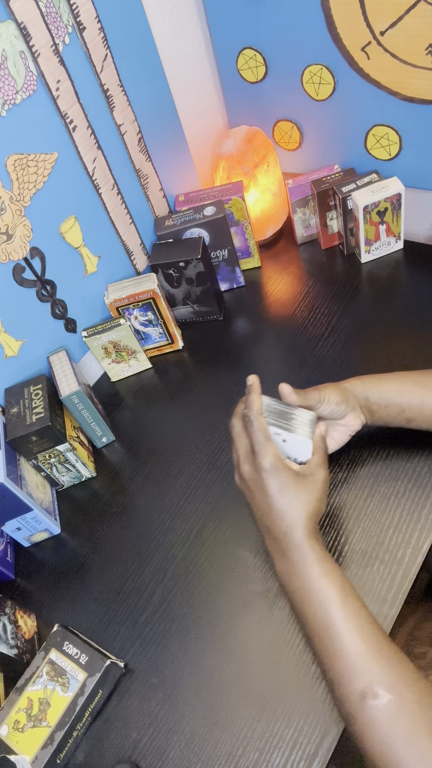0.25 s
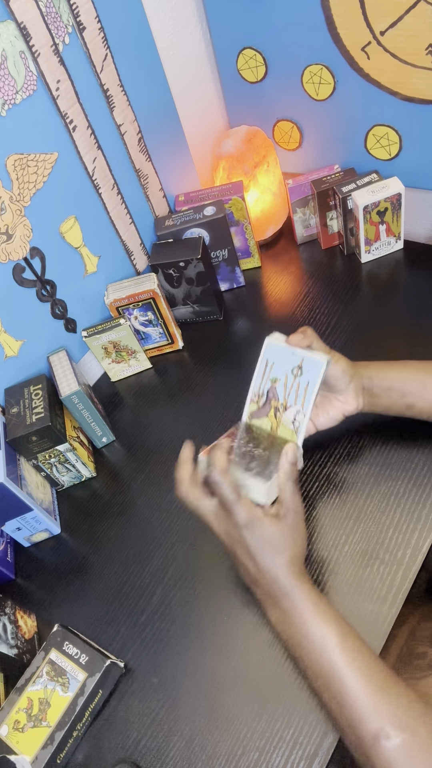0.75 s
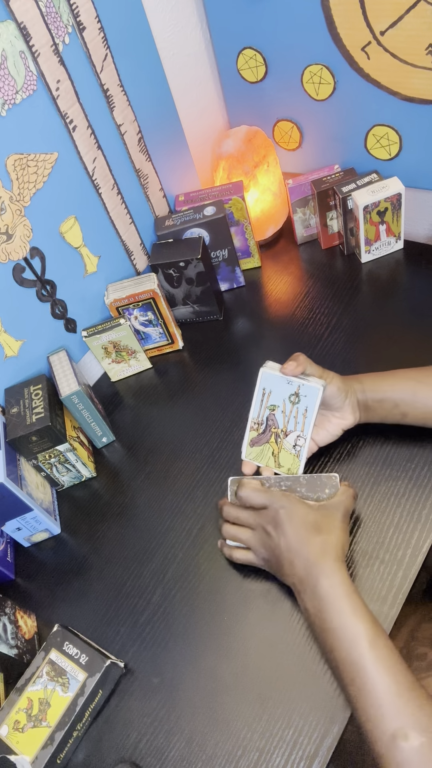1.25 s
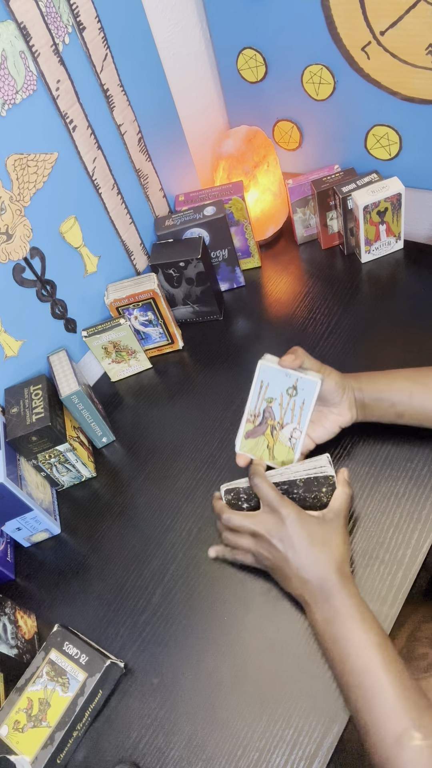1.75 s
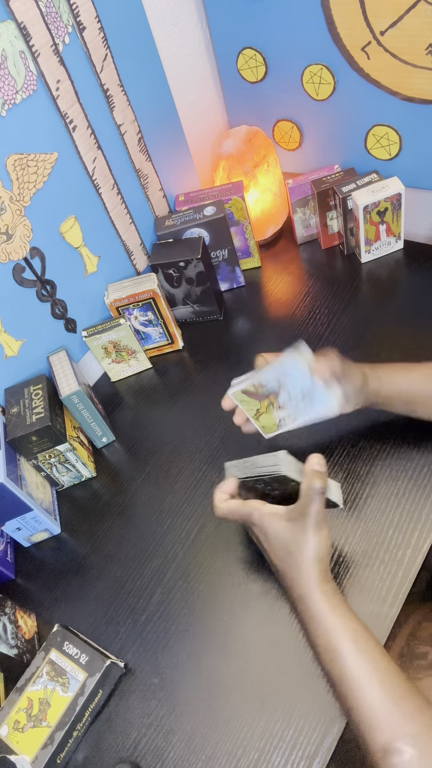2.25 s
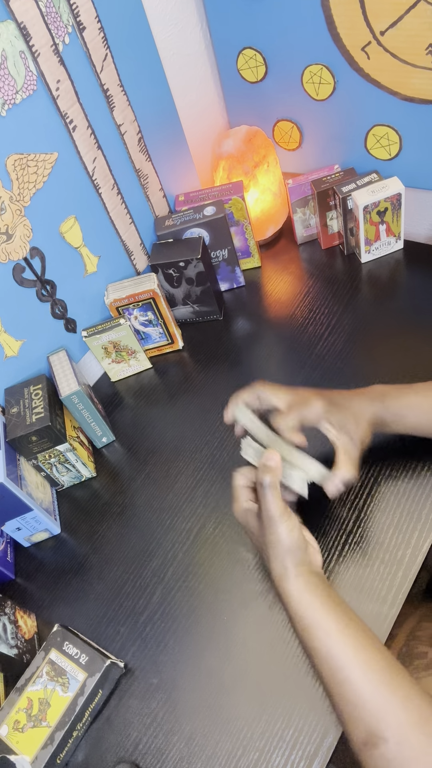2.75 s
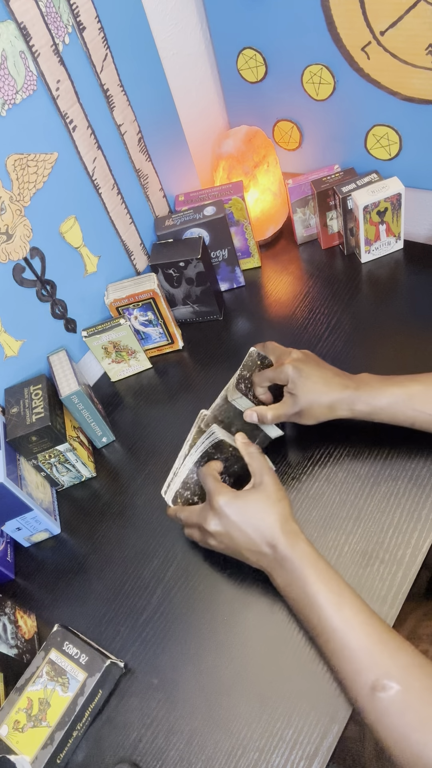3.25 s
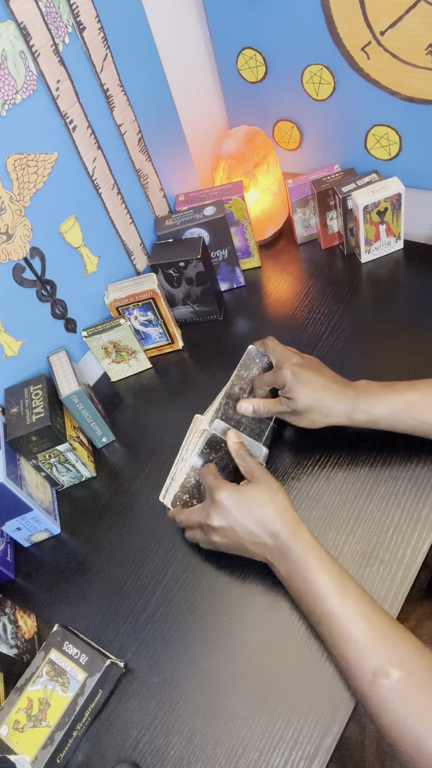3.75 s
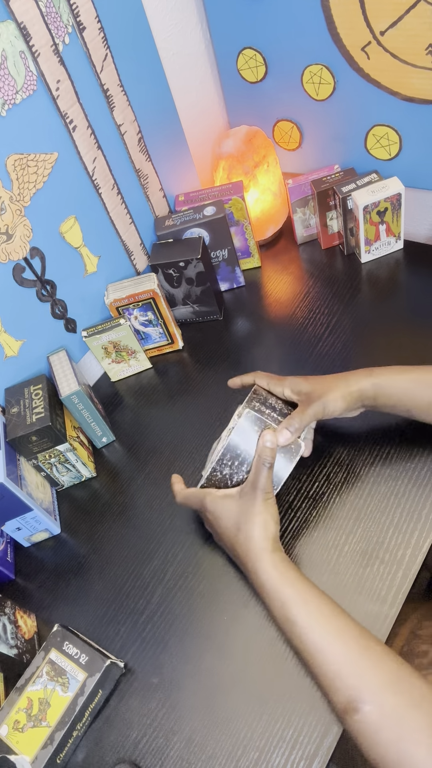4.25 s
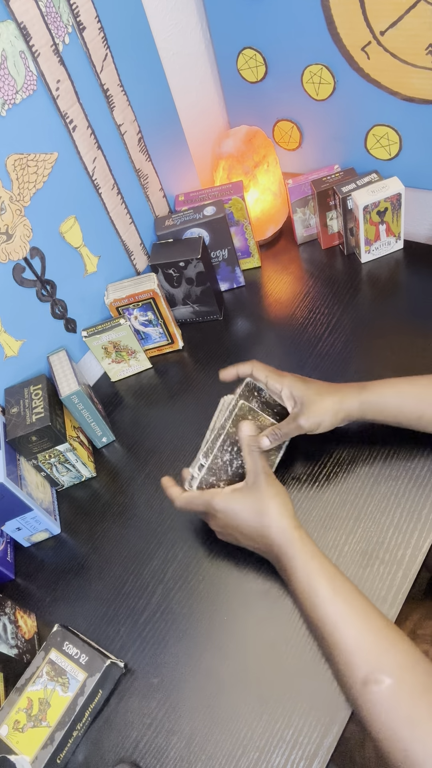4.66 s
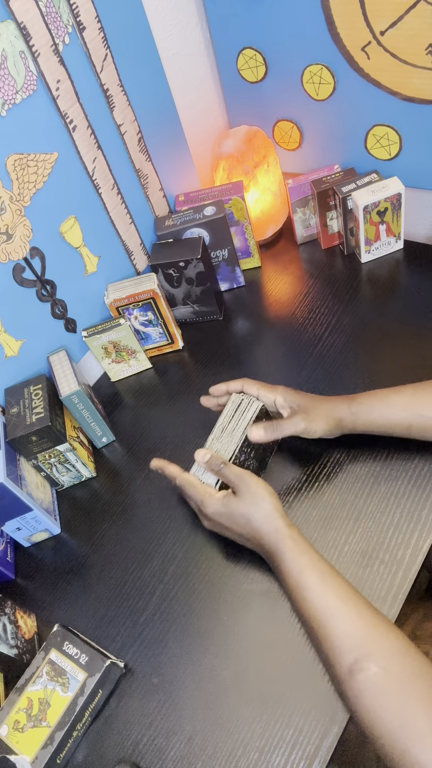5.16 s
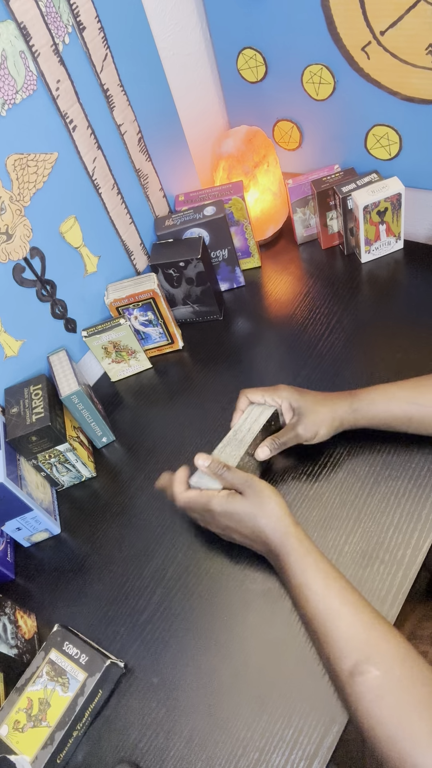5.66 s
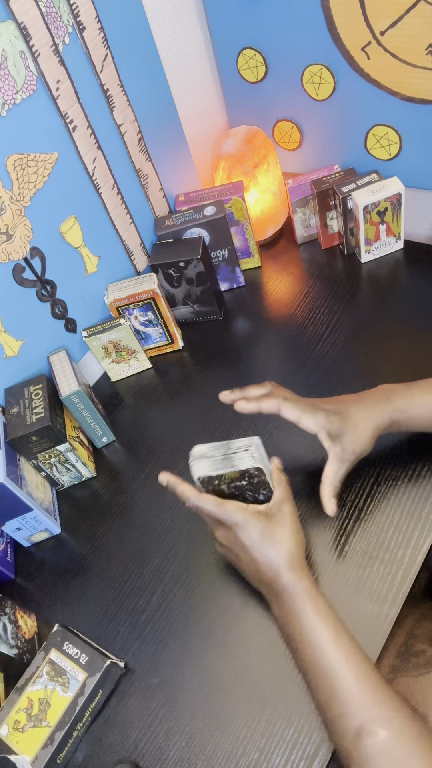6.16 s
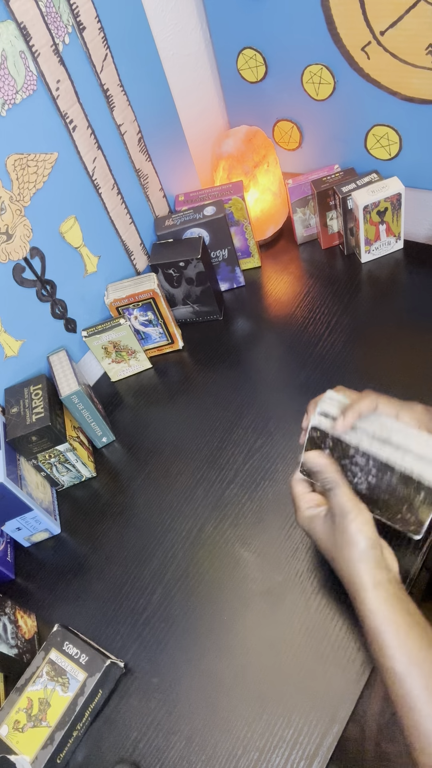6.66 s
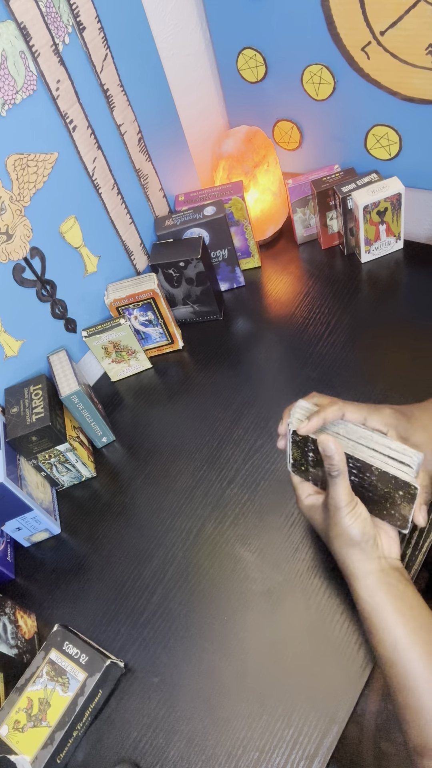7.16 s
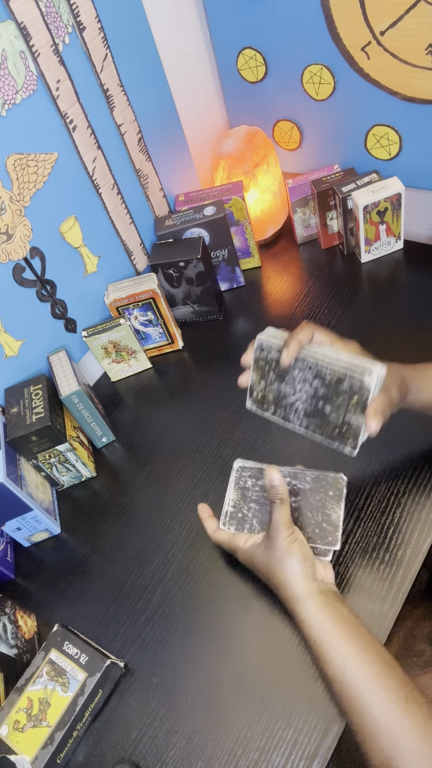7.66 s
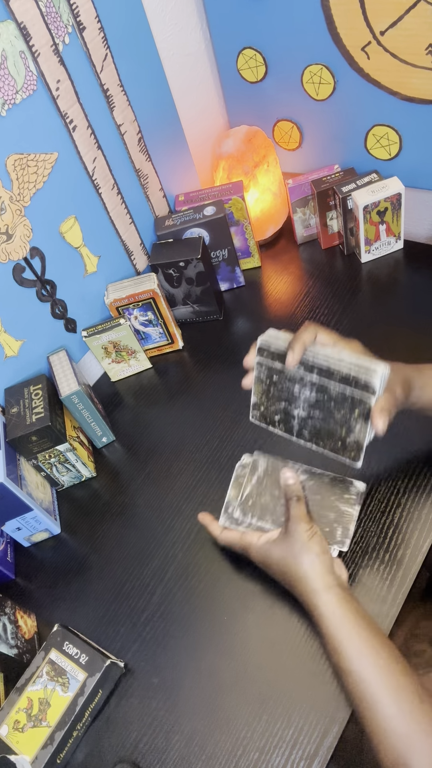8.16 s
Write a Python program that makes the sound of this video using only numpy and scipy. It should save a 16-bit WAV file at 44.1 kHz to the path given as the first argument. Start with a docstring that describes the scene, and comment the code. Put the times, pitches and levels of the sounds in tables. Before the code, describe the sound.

Heard from close by in a small quiet room, cards tap and rub as a deck is split on a wooden tabletop. A short creak leads into a loud, crisp riffle, and the cards spring back together in a quieter ripple. A cluster of clacks and a dull table thump follow as the deck is straightened, then soft swishes and small slaps of an overhand shuffle.

```python
"""A deck of large cards on a wooden table in a small room, heard close by a pair of microphones.
The deck is cut and knocked square, creaks as the thumb bends it, is riffled together and springs out of a bridge,
then is knocked square again and shuffled overhand. Each contact is a short crush of many card edges ringing a packet;
the table top booms under it from low damped modes, and card faces rub in between as shaped, flickering noise.
A steady faint room tone lies beneath, and changing reflections surround the cards."""
import sys
import numpy as np
from scipy import signal
from scipy.fft import rfft, irfft
from scipy.io import wavfile

SR = 44100
rng = np.random.default_rng(int(sys.argv[2]) if len(sys.argv) > 2 else 0)


def master_out(mix):
    """Clip the mix to full scale and print it as 16-bit PCM to the path in sys.argv[1]."""
    frames = np.transpose(np.atleast_2d(mix))
    ceiling = np.clip(frames, -1, 1)
    pcm = np.round(ceiling * 32767).astype(np.int16)
    wavfile.write(sys.argv[1], SR, pcm)


N = 370440
TIME = np.arange(N) / SR
SLIDE_TIME = TIME[::64]   # coarse clock, enough for slow changes of level


def from_db(db):
    """Amplitude ratio of a level in dB."""
    return 10 ** (np.asarray(db) / 20)


def unit_energy(x):
    """Scale a sound so that its squares sum to 1."""
    return x / np.sqrt(np.sum(x ** 2) + 1e-30)


def seconds(length):
    """Clock in seconds for a short sound."""
    return np.arange(int(length * SR)) / SR


def add(track, s, sound):
    """Mix a sound into the track from time s on."""
    start = int(np.clip(s * SR, 0, N - 1))
    track[start:start + len(sound)] += sound[:N - start]


def convolve(x, response):
    """Pass a sound through an impulse response, keeping its length."""
    return signal.fftconvolve(x, response)[:len(x)]


def butter(x, hz, kind, order):
    """Butterworth filter."""
    return signal.sosfilt(signal.butter(order, hz, kind, fs=SR, output="sos"), x)


def coloured(x, spectrum):
    """Give a steady noise a spectrum; rms 1."""
    hz, db = np.transpose(spectrum)
    bins_hz = np.fft.rfftfreq(N, 1 / SR)
    gain = from_db(np.interp(np.log(bins_hz + 1), np.log(hz), db))
    return unit_energy(irfft(rfft(x) * gain, N)) * np.sqrt(N)


def wander(hz):
    """Slow random drift through hz random points per second of spread 1."""
    knots = rng.standard_normal(1000)
    return np.interp(SLIDE_TIME * hz, np.arange(len(knots)), knots)


# The still room. Each row: frequency in Hz, relative level in dB per Hz.
STILL_ROOM_SPECTRUM = [(20, -31), (45, 2), (80, 12), (110, -7), (145, -5), (200, -9.5), (320, -21),
                       (550, -37), (1100, -43.5), (1650, -47), (2000, -32.5), (2400, -44.5), (6000, -39.5),
                       (15000, -45.5)]


def still_room(level_db):
    """Steady noise, strongest in the bass, independent of the hands."""
    return from_db(level_db) * coloured(rng.standard_normal(N), STILL_ROOM_SPECTRUM)


def resonances(modes):
    """Damped modes, a wider one dying sooner; energy 1."""
    t = seconds(.08)
    ring = np.zeros(len(t))
    for hz, width, db in modes:
        decay = width * np.exp(-np.pi * width * t)   # the factor of width keeps db the height of the peak
        ring += from_db(db) * decay * np.cos(2 * np.pi * hz * t)
    return unit_energy(ring)


def disperse(x, hz, count):
    """Bending waves in card are slower at low pitch, so a click comes out as a falling chirp."""
    pole = np.exp(-2 * np.pi * hz / SR)
    return signal.sosfilt(np.tile([-pole, 1, 0, 1, -pole, 0], (count, 1)), x)


def cushion(x, hz):
    """A soft contact rounds the push: two gentle low-passes in a row."""
    r = np.exp(-2 * np.pi * hz / SR)
    return signal.lfilter([(1 - r) ** 2], [1, -2 * r, r * r], x)


# The wooden table top's low modes. Each row: frequency in Hz, relative level in dB, time to fall 60 dB in s.
TABLE_TOP_MODES = [(69.6, -19.5, 0.21), (84.6, -21.5, 0.57), (144.36, 2, .19), (173.5, -17.5, 0.36),
                   (193, -14, 0.31), (239.8, -11.5, 0.22), (298.1, -8.5, 0.088), (331, -4.5, 0.085)]


def table_ring(push_ms):
    """The table top answers a soft push with its low modes; energy 1."""
    t = seconds(.4)
    ring = np.zeros(len(t))
    for k, (hz, db, t60) in enumerate(TABLE_TOP_MODES):
        ring += (-1) ** k * from_db(db - 60 * t / t60) * np.sin(2 * np.pi * hz * t)
    push = t * np.exp(-1000 * t / push_ms)
    return unit_energy(butter(convolve(ring, push), 45, "high", order=2))   # the deepest bass falls away below about 45 Hz


# Knock, clack, crack and fizz registers. Each row: low edge in Hz, high edge in Hz.
REGISTER_EDGES = [(200, 813), (780, 2435), (2300, 4430), (4700, 13000)]
# A harder contact tips the colour. Listed for knock, clack, crack, fizz: dB of level per dB of brightness.
BRIGHTNESS_TILT = (-1.14, 0.18, 1, 1.6)
CLACK_CORNER_HZ, CRACK_CORNER_HZ = 3600, 5560   # roll-off within those registers at brightness 0
CORNER_FOLLOWS = 0.94   # a softer contact leans lower: dB of corner frequency per dB of brightness


def contacts(rows, modes, colour_db, ring_db, knock_hz, top_db, grain, slap, bend_hz, detune, count):
    """Card edges land within a few ms, with a slap at the thick of the crush, and ring the packet; the table booms."""
    body = from_db(ring_db) * resonances(modes)
    body[0] += 1   # the direct click, together with the ring
    body = disperse(body, bend_hz, count)
    *lower, fizz = [butter(body, edges, "band", order=4) for edges in REGISTER_EDGES]
    top = from_db(top_db) * butter(fizz, 5700, "high", order=3)   # thick packets have little top
    fizz = butter(fizz, 5500, "low", order=3) + top
    corners_hz = [knock_hz, CLACK_CORNER_HZ, CRACK_CORNER_HZ]
    ms = 1000 * np.arange(len(body)) / SR
    one_ms = np.sqrt(SR / 1000)   # levels count energy as if packed into 1 ms
    cards, table, boom = np.zeros(N), np.zeros(N), table_ring(push_ms=0.42)
    for s, contact_ms, level_db, bright_db, boom_db in rows:
        hard = from_db(CORNER_FOLLOWS * bright_db)
        stretch = np.exp(detune * rng.standard_normal())   # the free length of card, and so its pitch, differs
        registers = []
        for register, corner_hz in zip(lower, corners_hz):
            rounded = cushion(register, corner_hz * hard)
            registers.append(np.interp(ms * stretch, ms, rounded, right=0))
        registers.append(fizz)
        crush = np.sqrt(ms) * np.exp(-ms / contact_ms)
        levels_db = level_db + np.array(colour_db) + bright_db * np.array(BRIGHTNESS_TILT)
        for k, (response, db) in enumerate(zip(registers, levels_db)):
            edge_sizes = np.exp(grain * rng.standard_normal(len(ms)))
            force = unit_energy(crush * rng.standard_normal(len(ms)) * edge_sizes)
            force[np.argmax(crush)] += slap / (1 + k) ** 2   # the slap is one pulse, felt most in the low registers
            add(cards, s, one_ms * from_db(db) * unit_energy(convolve(force, response)))
        add(table, s, one_ms * from_db(boom_db) * boom)
    return np.array([cards, table])


# Packets knocked on the table and against each other.
# Each row: start in seconds, contact time in ms, level in dB, brightness in dB, table boom in dB.
KNOCKS = [(0.0, 2.7, -16.5, 5, -11), (0.0086, 3.9, -18.5, 6.5, -28.5), (0.2571, 3.8, -69, -26, -39),
          (1.1667, 2.8, -36.5, 0.5, -27), (1.476, 1.3, -34.5, 0.5, -42), (1.484, 14, -26, -1, -43),
          (1.4997, 6, -24, -1.5, -31), (1.5104, 6.9, -24, -4.5, -17), (1.663, 7.2, -32.5, -4, -24),
          (1.913, 4.7, -54.5, 8.5, -57), (2.0219, 16.4, -21.5, -1, -27.5), (2.0333, 4.5, -6, 3, -9.5),
          (2.3987, 4.3, -55, -2.5, -38.5), (3.0777, 2.33, -26.5, -2, -28), (4.0296, 3.6, -38.5, 1, -37),
          (4.0741, 3.7, -54, -17, -23), (4.0943, 4.6, -53.5, -25, -19), (4.8303, 5.2, -20.5, -6, -34),
          (4.841, 1.8, -35.5, -9, -9), (4.8849, 2.15, -12.5, 8, -20), (4.8996, 3.65, -12.5, 3.5, -9.5),
          (4.99, 3.1, -24.5, 4, -35), (5.0577, 3.15, -25, 4, -45), (5.0807, 1.16, -17, 7.5, -24.5),
          (5.1077, 1.5, -27.5, -8, -34), (5.12, 2.2, -31, 5.5, -47), (5.155, 5.1, -23, 2, -43),
          (5.2213, 2.3, -33.5, 1.5, -41), (5.3034, 2.8, -36, -2.5, -51), (5.401, 2.2, -34.5, 1, -24.5),
          (5.4197, 4.2, -29, 0, -48), (5.429, 1.74, -27, 7, -27.5), (5.5336, 6.7, -29.5, 1.5, -46),
          (5.6091, 6.1, -39.5, 2.5, -62), (5.6721, 6.8, -46, -11.5, -47), (6.1549, 0.95, -25.5, -10, -14),
          (6.1629, 7.5, -21.5, -15, 0.5), (6.5253, 2.84, -49.5, 5.5, -38.5), (6.6129, 5, -50, -0.5, -44)]
# The stiff packet. Each row: frequency in Hz, width in Hz, relative level in dB.
STIFF_PACKET_MODES = [(865, 58, -12.5), (1031, 34, -23), (1320, 91, 8.5), (1750, 350, 5), (1961, 130, 10),
                      (2550, 64, 1.5), (2570, 43, 8), (3210, 62, 4), (3340, 66, 5.5), (3720, 50, -1.5),
                      (4240, 61, -26)]
# Colour of a knock. Listed for knock, clack, crack, fizz: level in dB.
KNOCK_COLOUR = (-2, -0.5, -5.5, -18)


def knocked_packets():
    """Edges crushed together ring the stiff packet, with little fizz at the top."""
    return contacts(KNOCKS, STIFF_PACKET_MODES, KNOCK_COLOUR, ring_db=-9, knock_hz=764, top_db=-18.5,
                    grain=0.45, slap=1.0, bend_hz=450, detune=.025, count=6)


# Card faces sliding over each other.
# Each row: time of fastest slide in seconds, length in s, rub level in dB, hiss above the rub in dB.
SLIDES = [(0.022, 0.13, -38, -33), (0.187, 0.071, -54.5, -4), (0.406, 0.17, -70.5, -1),
          (0.573, 0.093, -64, 4.5), (0.723, 0.073, -62.5, -1), (0.862, 0.099, -64, 6.5),
          (1.091, 0.074, -57.5, 1), (1.224, 0.13, -64, -9), (1.387, 0.052, -61.5, 1.5),
          (1.532, 0.076, -60, -12), (1.686, 0.043, -59, -0.5), (1.82, 0.058, -69, -1), (2.34, 0.19, -74, 7),
          (2.514, .04, -64.5, 4.5), (3.065, .04, -57, -5), (3.202, 0.025, -50, -22),
          (3.367, 0.12, -37.5, -7), (3.663, 0.26, -40, 0.5), (3.926, 0.4, -60, 2.5),
          (4.226, 0.19, -58.5, 5.5), (4.269, 0.018, -36, 3), (4.436, 0.25, -41, -1),
          (4.768, 0.17, -65.5, 6.5), (4.957, 0.15, -49, -34), (5.266, 0.088, -63, -22),
          (5.437, .04, -43, -31), (5.51, 0.094, -54.5, -24), (5.721, 0.2, -59, 1), (5.882, 0.059, -67, 8),
          (6.18, 0.037, -60, 3.5), (6.535, 0.022, -58.5, -10), (6.622, 0.061, -68, 4),
          (6.764, 0.064, -65.5, 3.5), (6.913, 0.081, -73, 4), (7.074, 0.12, -71.5, 3),
          (7.291, 0.069, -53, 2.5), (7.58, 0.11, -55.5, -0.5), (7.803, 0.1, -63.5, 0),
          (7.872, 0.044, -47, 2.5), (8.068, 0.051, -58, 1), (8.15, 0.048, -42, -3), (8.41, 0.11, -51, 1.5)]
# The rub of the faces. Each row: frequency in Hz, relative level in dB per Hz.
RUB_SPECTRUM = [(150, 1), (350, 5), (800, -9.5), (1500, -2.5), (2000, 1), (2500, -3), (3400, -2),
                (5000, -10.5), (7000, -23.5)]
# The hiss above it. Each row: frequency in Hz, relative level in dB per Hz.
HISS_SPECTRUM = [(2500, -30.5), (4700, 0.5), (7000, -4), (9000, -1.5), (12000, -1), (14000, -2), (15500, 0)]
SLIDE_RISE_SHARE, SLIDE_SHAPE = 0.57, 1.95   # share of length spent speeding up; roundness (1 pointed, 2 bell)
CREEP_DB, CREEP_HISS_DB, CREEP_WANDER_DB = -85, -1, 3   # held cards never lie quite still


def slide_power(s, length):
    """Power of one slide: it speeds up until time s and slows again."""
    before = (s - SLIDE_TIME) / SLIDE_RISE_SHARE
    after = (SLIDE_TIME - s) / (1 - SLIDE_RISE_SHARE)
    away = np.where(SLIDE_TIME < s, before, after) / length
    return np.exp(-away ** SLIDE_SHAPE)


def sliding_faces(catches_per_s, catch_db, catch_ms, flutter_db):
    """Sliding faces hiss, flutter as single cards let go and catch on an edge."""
    rub_power = from_db(CREEP_DB + CREEP_WANDER_DB * wander(hz=12)) ** 2
    hiss_power = rub_power * from_db(CREEP_HISS_DB) ** 2
    for s, length, rub_db, hiss_db in SLIDES:
        power = from_db(rub_db) ** 2 * slide_power(s, length)
        rub_power = rub_power + power
        hiss_power = hiss_power + power * from_db(hiss_db) ** 2
    catches = (rng.random(N) < catches_per_s / SR) * np.minimum(rng.exponential(1, N), 2)
    catch_decay = np.exp(-1000 / (catch_ms * SR))
    friction = 1 + from_db(catch_db) * signal.lfilter([1], [1, -catch_decay], catches)
    flutter = np.sqrt(N) * unit_energy(butter(rng.standard_normal(N), 110, "low", order=2))
    friction = friction * from_db(flutter_db * flutter)
    rub = coloured(friction * rng.standard_normal(N), RUB_SPECTRUM)
    hiss = coloured(friction * rng.standard_normal(N), HISS_SPECTRUM)
    rub_level = np.sqrt(np.interp(TIME, SLIDE_TIME, rub_power))
    hiss_level = np.sqrt(np.interp(TIME, SLIDE_TIME, hiss_power))
    return rub_level * rub + hiss_level * hiss


# The hands stir the table. Each row: time in seconds, rumble level in dB.
STIRRING = [(0.1, -44), (0.45, -62.5), (0.85, -56.5), (1.1, -45), (1.35, -55.5), (1.6, -49.5), (2.6, -57),
            (3.75, -48.5), (4.0, -57.5), (4.15, -47), (4.7, -60), (5.7, -46.5), (6.0, -64), (6.33, -49.5),
            (6.6, -75), (8.4, -56)]


def stirred_table():
    """Random pushing of the hands keeps the table's low modes rumbling."""
    rumble = convolve(rng.standard_normal(N), table_ring(push_ms=5.1))
    return from_db(np.interp(TIME, *np.transpose(STIRRING))) * rumble


# Packets pulled off and dropped into the hand.
# Each row: start in seconds, contact time in ms, level in dB, brightness in dB, table boom in dB.
HAND_DROPS = [(0.8293, 10, -46, 5, -57), (0.8699, 2.45, -47, -4, -61), (1.3846, 11, -47, 1.5, -42),
              (2.856, 1.63, -55, 6, -48.5), (7.2873, 6.4, -33, 0, -37.5), (7.3009, 2.7, -20, -9, -23.5),
              (7.463, 6.6, -37, 0, -35.5), (7.535, 2, -43, -4.5, -44), (7.5883, 5.3, -33.5, -2.5, -56),
              (7.6104, 1.63, -38, -4.5, -32.5), (7.7573, 4.3, -44, -1.5, -37.5),
              (7.8603, 5.6, -28, -0.5, -50), (7.88, 2.63, -24.5, 0.5, -29.5), (8.0223, 5.8, -40.5, 0, -46),
              (8.1376, 5.4, -33.5, -0.5, -30), (8.174, 2.6, -37.5, -5.5, -48),
              (8.3036, 4.5, -40.5, -1.5, -33.5), (8.3123, 3.4, -34, -4, -45)]
# A packet in the cupped hand. Each row: frequency in Hz, width in Hz, relative level in dB.
CUPPED_HAND_MODES = [(370, 30, 11), (686, 56, 31), (1320, 310, 21), (2630, 540, 11)]
# Colour of a drop. Listed for knock, clack, crack, fizz: level in dB.
DROP_COLOUR = (-5.5, -1, -1, 1)


def dropped_packets():
    """Packets landing in the hand ring with the cupped hand's resonances, with a grainier crush."""
    return contacts(HAND_DROPS, CUPPED_HAND_MODES, DROP_COLOUR, ring_db=-18, knock_hz=1390, top_db=-3.5,
                    grain=0.67, slap=1.1, bend_hz=456, detune=0.037, count=6)


# The bent deck creaks under the thumb. Each row: time in seconds, slips per second, level in dB.
THUMB_CREAK = [(2.757, 29.7, -43.5), (2.789, 60, -38), (2.881, 53, -53.5), (2.92, 52, -58.5),
               (2.991, 46, -49), (3.04, 43, -53)]
# The bent packet. Each row: frequency in Hz, width in Hz, relative level in dB.
BENT_PACKET_MODES = [(1550, 220, 3.5), (1990, 240, 14.5), (2550, 320, 1)]


def creak(unevenness, scrape_db):
    """Stick and slip: every slip clicks through the bent packet, and a faint scrape runs between the slips."""
    s, per_s, db = np.transpose(THUMB_CREAK)
    slips, now = np.zeros(N), s[0]
    while now < s[-1]:
        slips[int(now * SR)] = np.sqrt(SR / 1000)
        now += np.exp(unevenness * rng.standard_normal()) / np.interp(now, s, per_s)
    scrape = from_db(scrape_db) * rng.standard_normal(N)
    bending = (TIME >= s[0] - .001) & (TIME < s[-1])
    force = (slips + scrape) * from_db(np.interp(TIME, s, db)) * bending
    return butter(convolve(force, resonances(BENT_PACKET_MODES)), [1250, 2750], "band", order=3)


# Single cards flick down between the clumps.
# Each row: start in seconds, length in s, cards per second, level in dB, brightness in dB.
CARD_FLURRIES = [(3.3, .53, 26, -25.5, -1.5), (4.3, .34, 24, -47, 1)]
FLICK_MS, FLICK_SCATTER_DB, FLICK_BOOM_DB = 1.2, 3, -4   # contact; spread of level and brightness; boom against level


def flicks():
    """Single cards leave at an uneven pace, each with its own strength and brightness; returns contact rows."""
    rows = []
    for start, length, per_s, db, bright_db in CARD_FLURRIES:
        for k, (late, louder, harder) in enumerate(rng.standard_normal((40, 3))):
            after = (k + np.clip(.3 * late, -.5, .5)) / per_s
            if after < length:
                level_db = db + FLICK_SCATTER_DB * louder
                card_bright_db = bright_db + FLICK_SCATTER_DB * harder
                rows.append((start + after, FLICK_MS, level_db, card_bright_db, db + FLICK_BOOM_DB))
    return rows


# Clumps of cards springing off the thumbs, then out of the bridge.
# Each row: start in seconds, contact time in ms, level in dB, brightness in dB, table boom in dB.
CLUMPS = [(3.21, 5.1, -19, -4.5, -29), (3.237, 3.06, -17.5, -1.5, -20.5), (3.263, 2.8, -7.5, -0.5, -18.5),
          (3.306, 0.67, -20.5, -1, -27.5), (3.3397, 1.3, -19, 7.5, -25), (3.365, 2.95, -14, 0.5, -26),
          (3.3983, 3.6, -15.5, 0, -13.5), (3.446, 2.2, -9, -0.5, -22), (3.4563, 1.4, -18.5, -0.5, -20),
          (3.4713, 2.1, -13.5, -5.5, -10), (3.523, 2.6, -14, 4, -15.5), (3.5336, 5.8, -19, 3, -29.5),
          (3.574, 2, -24.5, 0.5, -24.5), (3.6043, 6.1, -17, -4, -17.5), (3.6137, 1.8, -7.5, -1, -17),
          (3.6433, 2.4, -14, 4, -9), (3.693, 3.5, -8, 2.5, -27), (3.7157, 1.36, -13, 3, -12.5),
          (3.748, 1.9, -12, -1, -13), (3.753, 0.85, -15.5, 2, -29), (3.784, 3.9, -14.5, -0.5, -31),
          (3.7893, 1.7, -14.5, 3.5, -22), (3.817, 2, -23, 3, -28), (4.2685, 3.86, -17, -0.5, -46.5),
          (4.2777, 1.3, -28, 6.5, -45), (4.2997, 1.43, -25, -3, -52), (4.314, 1.2, -36, -9, -28.5),
          (4.3427, 4.1, -37, 4.5, -46), (4.3596, 2.8, -33, -13.5, -39), (4.3783, 3.3, -24, 2, -34),
          (4.4153, 0.72, -23.5, -5.5, -48), (4.4507, 2.4, -21.5, -2.5, -42),
          (4.4853, 2.1, -21.5, -4, -27.5), (4.5153, 1.3, -26.5, -2, -44), (4.5393, 3.1, -23, 0, -37.5),
          (4.553, 2.6, -23, 2.5, -31), (4.5793, 3.4, -37, 8, -54), (4.6003, 3.25, -30.5, 2.5, -47)]
# Loose cards. Each row: frequency in Hz, width in Hz, relative level in dB.
LOOSE_CARD_MODES = [(830, 24, -3.5), (1330, 67, -5.5), (1700, 310, -0.5), (2130, 62, 4.5), (2770, 16, 2.5),
                    (2800, 27, 5), (3260, 69, 1.5), (3840, 56, -19), (5360, 44, -6)]
# Colour of a snap. Listed for knock, clack, crack, fizz: level in dB.
SNAP_COLOUR = (-5.5, -0.5, -1, -2)


def springing_cards():
    """Clumps and single flicks ring the loose cards, with a strong slap."""
    return contacts(list(CLUMPS) + flicks(), LOOSE_CARD_MODES, SNAP_COLOUR, ring_db=-11.5, knock_hz=1100,
                    top_db=-7.5, grain=0.45, slap=1.2, bend_hz=600, detune=0.046, count=8)


def soften(x, hz, shelf_db):
    """Soft surfaces damp the upper end: a shelf falling from hz."""
    low = butter(x, hz, "low", order=1)
    return low + from_db(shelf_db) * (x - low)


def reflections(t60, late_db, late_t60, wall_hz):
    """Dense echoes off table, boxes and walls, then a faint longer ring in the middle register."""
    t = seconds(.6)
    early = rng.standard_normal(len(t)) * from_db(-60 * t / t60)
    late = butter(rng.standard_normal(len(t)), [1500, 2400], "band", order=1)
    late = late * from_db(late_db - 60 * t / late_t60)
    echoes = (early + late) * (t > .004)   # nothing returns in the first 4 ms
    return soften(unit_energy(echoes), hz=wall_hz, shelf_db=-21)


def room(x, wet_db, apart_db, move_s, count):
    """The cards keep moving, so the sound passes from one pattern of reflections to the next."""
    out = np.array([x, x])
    for place in range(count):
        distance = np.abs((TIME / move_s - place + 1) % count - 1)   # in steps from this place, going round
        here = x * np.sqrt(np.maximum(1 - distance, 0))
        shared, apart = [reflections(t60=0.16, late_db=-7.0, late_t60=0.35, wall_hz=5560) for _ in range(2)]
        apart = from_db(apart_db) * butter(apart, [900, 15000], "band", order=1)   # close mics differ little in bass
        responses = np.array([shared + apart, shared - apart])
        out += from_db(wet_db) * signal.oaconvolve(here[None], responses, axes=1)[:, :N]
    return out


def scene():
    """Hands and cards sound through the room; the table booms close by, over a faint room tone."""
    still = still_room(level_db=-54)
    cards, table = knocked_packets() + dropped_packets() + springing_cards()
    cards = cards + sliding_faces(catches_per_s=63, catch_db=6.5, catch_ms=1.0, flutter_db=3.0)
    cards = cards + creak(unevenness=0.028, scrape_db=-28)
    table = table + stirred_table()
    heard = room(cards, wet_db=-3.5, apart_db=-4.0, move_s=.06, count=7)
    return heard + table + still


def record(dry):
    """In the treble the left microphone lags the right; peaks stop at full scale, then the top is cut."""
    lag_from_hz, lag_s, cutoff_hz = 3900, 130e-6, 16000
    phase = -2 * np.pi * lag_s * np.maximum(np.fft.rfftfreq(N, 1 / SR) - lag_from_hz, 0)
    left = from_db(0.53) * irfft(rfft(dry[0]) * np.exp(1j * phase), N)
    pair = np.clip([left, dry[1]], -1, 1)
    return signal.sosfilt(signal.ellip(10, .1, 80, cutoff_hz, fs=SR, output="sos"), pair)


dry = scene()
out = record(dry)
master_out(out)
```